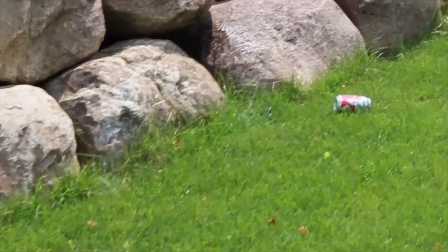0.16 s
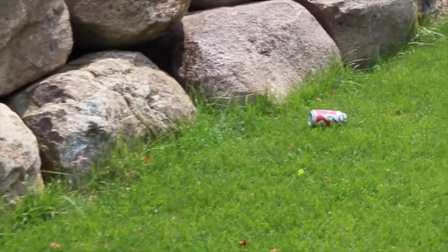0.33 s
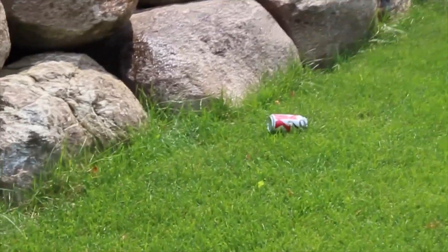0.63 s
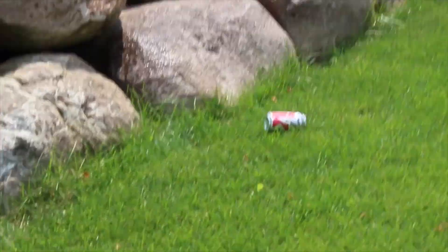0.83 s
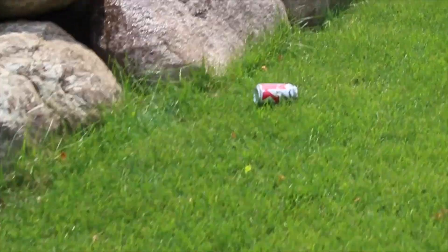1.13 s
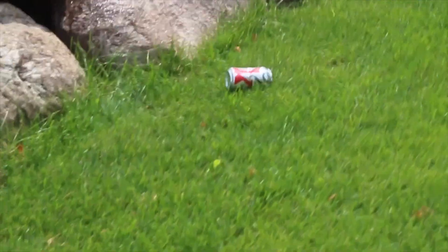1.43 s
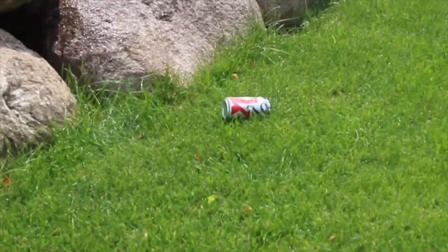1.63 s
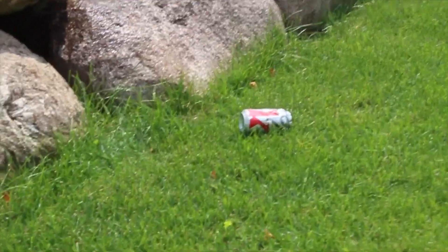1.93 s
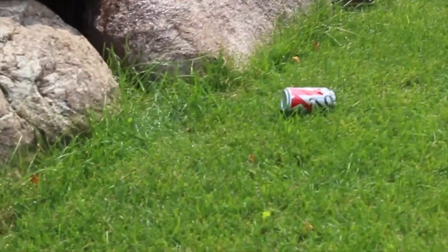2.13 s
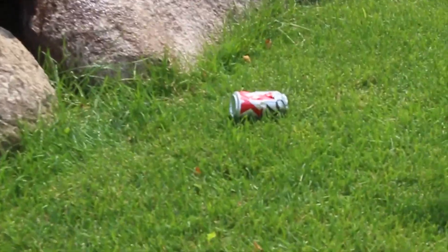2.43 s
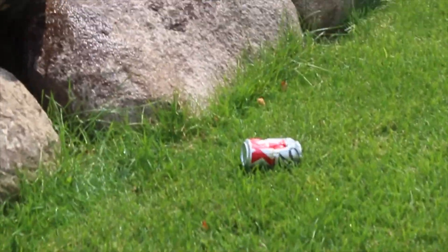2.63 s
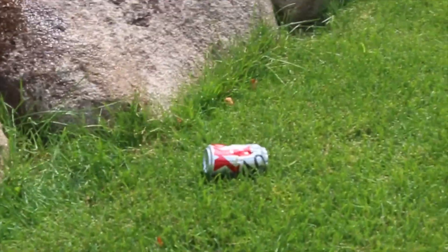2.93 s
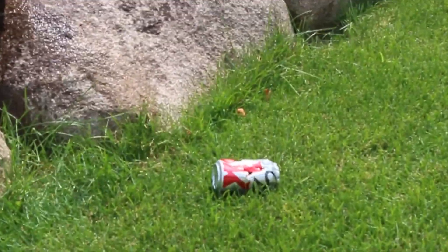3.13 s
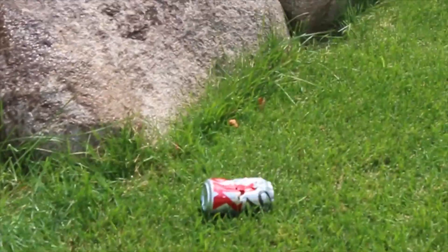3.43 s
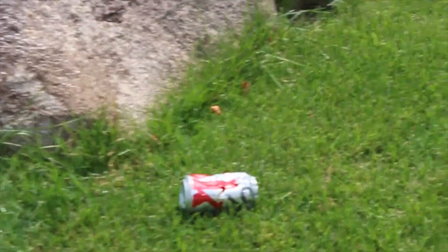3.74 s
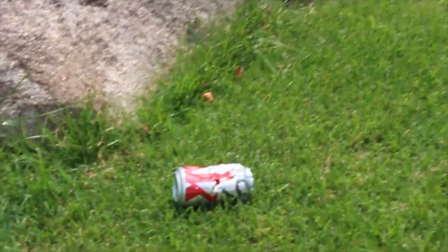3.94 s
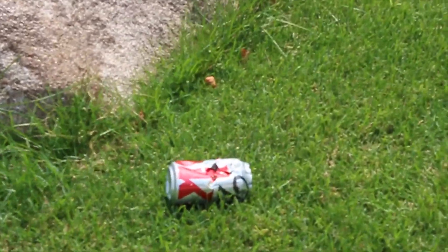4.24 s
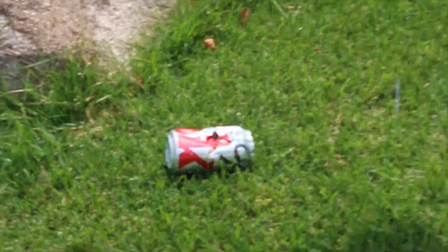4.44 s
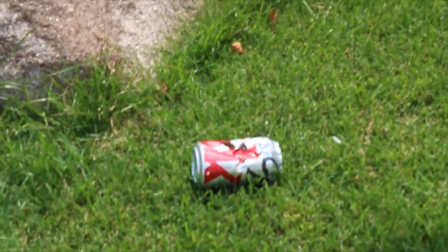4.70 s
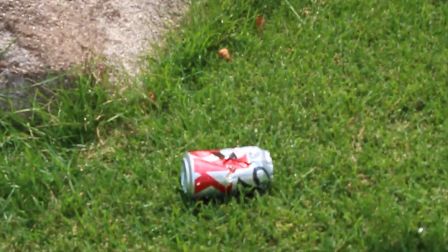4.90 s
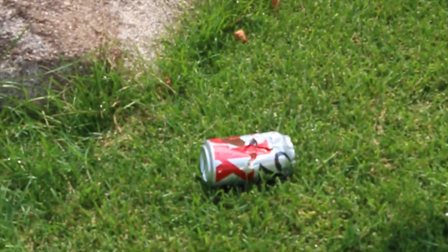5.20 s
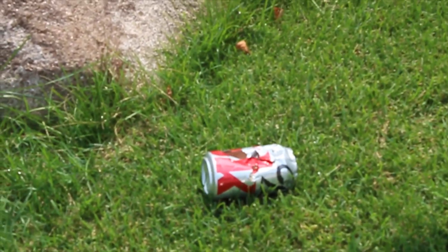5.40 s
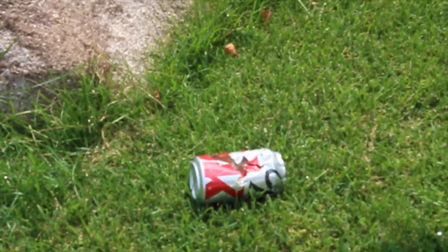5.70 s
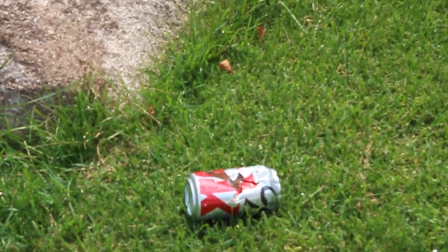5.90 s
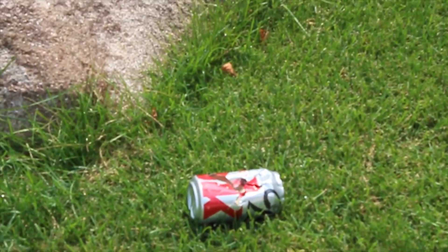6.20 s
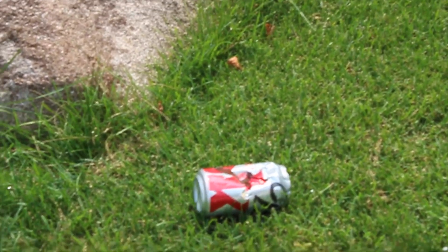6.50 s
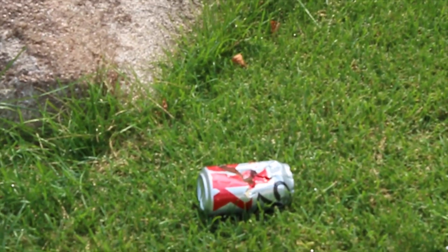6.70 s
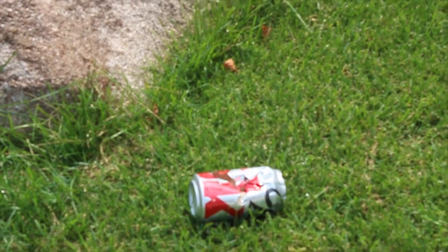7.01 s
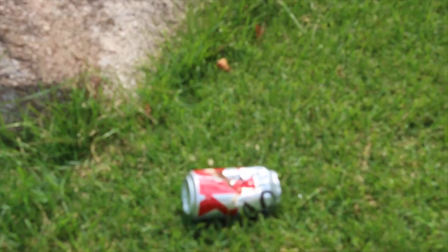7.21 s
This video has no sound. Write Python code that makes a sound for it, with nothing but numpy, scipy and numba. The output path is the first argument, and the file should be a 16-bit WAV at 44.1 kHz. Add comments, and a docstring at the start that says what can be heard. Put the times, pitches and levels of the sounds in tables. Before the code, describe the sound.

In an open backyard with a faint hum of far traffic, a gas pellet pistol cracks close to the microphone, two or three times a second. Every shot joins a puff of gas, a click on a thin metal can and the slide snapping shut, followed by a brief outdoor echo. The trigger ticks softly in the gaps. The clacks grow stronger and the can duller, and the last three shots are quicker and lighter.

```python
"""Far traffic hums over a lawn. Then a gas-powered toy pistol fires eighteen times at a drink can.
In each shot gas bursts out, the pellet hits the can, and the slide (the pistol's moving top) thumps
back, picks up a new pellet and slams shut. The ground, boulders and a far wall send the sound back.
The nearby camera turns itself down at loud shots, so the hum dips and then swells again.
Between shots the trigger ticks. The last few shots come faster and softer."""
import sys
import numpy as np
from scipy import signal
from scipy.fft import rfft, irfft, next_fast_len
from scipy.io import wavfile
from scipy.ndimage import uniform_filter1d
from numba import njit

SR = 44100
rng = np.random.default_rng(int(sys.argv[2]) if len(sys.argv) > 2 else 0)


def log_audio(samples):
    """Write samples as a 16-bit WAV file to the path given in sys.argv[1]."""
    # one column per channel
    frames = np.atleast_2d(samples).T
    # limit to full scale, then quantise
    limited = np.clip(frames, -1, 1)
    pcm = np.round(limited * 32767).astype(np.int16)
    wavfile.write(sys.argv[1], SR, pcm)


N = 324135

# The shots: t/s, blast level/dB, pellet delay/ms, pellet level/dB, shutting delay/ms, shutting level/dB
SHOTS = [(0.2614, 13.5, 11.0, 14, 52.3, -1), (0.9436, 11, 10.7, 15, 55, -1),
         (1.3106, 12, 11.1, 20, 56.4, 1.5), (1.6699, 15, 11.3, 15, 58.3, 0.5),
         (2.0477, 13.5, 11.4, 17, 59, 1.5), (2.391, 10.5, 8.6, 21.5, 59.1, 3.5),
         (2.75, 12.5, 9.7, 19.5, 59.3, 2.5), (3.103, 13.5, 8.2, 10, 59.5, 2.5),
         (3.464, 14, 7.7, 14.5, 59.4, 5), (4.2545, 16, 10.1, 20.5, 60.3, 8),
         (4.6643, 17.5, 8.8, 20.5, 59.7, 9), (5.084, 17.5, 8.65, 23, 61, 9.5),
         (5.5738, 19, 7.4, 17.5, 60.4, 10), (6.141, 19.5, 8.5, 15.5, 62.4, 11),
         (6.6143, 18.5, 10.4, 13.5, 62, 11.5), (6.891, 13.5, 11, 9, 64.4, 8.5),
         (7.0906, 11.5, 10.4, 3, 65.2, 6.5), (7.2954, 10.5, 11.5, 6, 68.0, 3.5)]
# The slide picks the next pellet out of the magazine: t/s, level/dB
PELLET_PICKUPS = [(0.2917, -6), (0.9778, -11), (1.3501, -5), (2.0861, -13.5), (2.4297, -10.5),
                  (2.7872, -10.5), (3.1426, -14), (3.4945, -7), (4.2951, -3), (4.7045, -3), (5.1262, -4.5),
                  (5.6168, -6), (6.1757, 2.5), (6.6579, -1.5), (6.9272, -2), (7.1292, -6.5), (7.3315, -10)]
# Ticks of the trigger: t/s, level/dB
TRIGGER_TICKS = [(.488, -32), (1.474, -26.5), (1.526, -31.5), (2.215, -34), (2.266, -40), (2.61, -32.5),
                 (2.921, -30), (3.272, -32.5), (3.641, -27.5), (4.449, -22), (4.833, -38.5), (4.892, -20.5),
                 (5.277, -21), (5.767, -19), (6.087, -37), (6.108, -37), (6.308, -28.5), (6.464, -29.5),
                 (6.472, -23), (6.567, -34), (6.768, -24), (6.845, -39), (7.011, -29), (7.215, -30)]

# Tone curves, which say how strong the low and high parts of a sound are: f/Hz, level/dB
GAS_TONE = [(40, -18), (100, -12), (300, -3.5), (450, -2), (640, -13), (950, 0), (1300, -6.5), (2000, -7),
            (2800, -2.5), (4500, -4.5), (6200, 0.5), (8500, -4.5), (12700, -12.5), (16000, -12)]  # escaping gas
STEEL_TONE = [(180, -51.5), (300, -29.5), (1190, -12.5), (1870, -1.5), (2210, -7), (2650, -1), (3080, -2.5),
              (3640, -2.5), (4090, -5), (6000, -6.5), (6740, -6.5), (14700, -14), (16000, -23)]  # steel parts
REAR_STOP_TONE = [(100, -37), (200, -12), (380, 1), (620, -9.5), (950, -1.5), (1500, -4.5), (2470, -13.5),
                  (5000, -19), (8600, -22.5), (16000, -33.5)]  # the slide hitting its rear stop
CAN_TONE = [(100, -33.5), (250, -11.5), (480, -1), (650, -11), (1000, -2.5), (1500, -8.5), (3100, -8),
            (5000, -11.5), (9000, -12.5), (16000, -22)]  # the pellet hitting the can
TRIGGER_TONE = [(350, -37.5), (600, -16.5), (1880, -5.5), (2680, -8.5), (3340, -17), (6460, -19),
                (7110, -11.5), (10600, -23), (14500, -21), (16000, -24)]  # small trigger parts
WALL_TONE = [(100, -13), (250, 7), (500, -2), (1000, -7.5), (3000, -11.5), (7000, -5.5), (12000, -16)]  # the far wall's echo
ROAD_TONE = [(15, -51.5), (30, -23.5), (45, -10), (60, -5.5), (80, -8), (112, 1.5), (170, -6), (416, -7),
             (754, -7.5), (1290, -11.5), (2000, -17.5), (3500, -24), (7300, -36), (11000, -40.5),
             (16000, -37.5)]  # the hum of the road
RUMBLE_TONE = [(15, -50.5), (30, -20.5), (55, 0.5), (80, -4.5), (130, -24.5), (300, -60), (16000, -120)]  # the deep rumble under it

# The notes a part rings with when hit (a fade is the time to drop 60 dB): f/Hz, level/dB, fade/s
SLIDE_NOTES = [(1713, -14.5, 0.0056), (2820, -3, 0.017), (3530, -6, 0.031), (4150, -6, 0.0077),
               (7200, -4, 0.0043)]  # the steel slide
FRAME_NOTES = [(336, -1, 0.0094), (770, -6, 0.06), (1170, -15.5, .06), (1420, -6.5, 0.043),
               (2030, -18, 0.091)]  # the pistol's hollow frame
CAN_NOTES = [(482, -7.5, 0.027), (1031, 1.5, 0.024), (1560, -12, 0.038), (2180, -6, 0.028),
             (2900, -2.5, 0.018)]  # the can's thin wall

# The can sags in pitch and rings less as it gets dented: t/s, pitch/ratio, ring level/dB
CAN_DENTING = [(0, 1, -6.5), (2.9, 0.98, -9), (3.4, 0.91, -5), (5.6, .88, -14), (7.35, 0.87, -13.5)]
# The yard answers less as the shooter walks up to the can: t/s, yard level/dB, frame boom level/dB
SHOOTER_WALK = [(0, 2, -0.5), (2, -0.75, -8), (3.6, -3.5, -0.5), (5, -7, 1), (6.3, -6, -0.5),
                (7.35, -5.5, 0)]
# Sound that lingers in the yard: f/Hz, fade/s, level/dB
YARD_FADES = [(100, 0.17, -30), (500, .3, -24), (2000, 0.46, -24), (4000, 0.9, -25), (7000, 0.9, -30.5),
              (10000, 1, -35), (15000, 0.42, -28.5)]
# Far traffic before the camera turns it down: t/s, hum level/dB, rumble level over the hum/dB
TRAFFIC_LEVELS = [(0, -38.5, -3.5), (1.3, -36, -8), (3.199, -40.5, -19.5), (4.199, -38.5, -19),
                  (6.6, -38, -21), (7.35, -46, -21)]

CRACK_ECHO_S, CRACK_ECHO_DB = .0031, -0.15  # the crack's echo off the ground, relative to the crack
STOP_SHARE, STOP_DB = .25, -8.5  # rear stop: share of the shutting delay, level relative to the blast
GROUND_ECHO_S = .0032  # delay of the rear stop's echo off the ground
SHOVE_DB, PAUSE_BOOST_DB_PER_S, COOLING_DB_PER_SHOT = -37.5, 22.5, 1.6  # the low thud of each blast
WALL_DELAY_S, WALL_RISE_S, WALL_FADE_S, WALL_DB = .075, 0.0064, 0.049, -35
TOP_HZ = 16000  # the camera picks up nothing higher


def gas_blasts():
    """The valve hisses, gas rushes up the barrel, shoves the air and cracks; the ground echoes it."""
    shots = shot_steps()["blast"]
    hiss = np.zeros(N)
    t = np.arange(-SR // 140, 0) / SR  # the 7 ms before a shot
    for s, db in shots:
        swell = amp(db - 26.0 + 3200 * t)
        hiss[round(s * SR) - len(t):][:len(t)] = swell * rng.standard_normal(len(t))
    rush = bursts(shots - (.002, 6), GAS_TONE, click=0, rise=0.0017, fade=0.059,
                  tail_db=-38.0, tail_fade=.05)
    # The low thud is louder after a longer pause and weakens as the gas cools.
    pause = np.diff(shots[:, 0], prepend=-.5)
    cooling_db = COOLING_DB_PER_SHOT * np.arange(len(shots))
    shove_db = shots[:, 1] + SHOVE_DB + PAUSE_BOOST_DB_PER_S * pause - cooling_db
    shove = place_hits(np.c_[shots[:, 0] - .001, shove_db], lambda s, t: air_push(t, width=0.0027))
    with_echo = np.r_[shots, shots + (CRACK_ECHO_S, CRACK_ECHO_DB)]
    cracks = bursts(with_echo, GAS_TONE, click=5.52, rise=0.00066, fade=0.021,
                    tail_db=-13.5, tail_fade=0.081)
    return shape_tone(hiss, STEEL_TONE) + rush + shove + cracks


def can_hits():
    """The pellet dents thin metal: a sharp click, a short rattle and a hollow ring."""
    times, pitch, ring_db = np.transpose(CAN_DENTING)

    def dented_ring(s, t):
        return amp(np.interp(s, times, ring_db)) * ringing(CAN_NOTES, t, np.interp(s, times, pitch))

    hits = shot_steps()["pellet"]
    ring = place_hits(hits, dented_ring)
    rattle = bursts(hits, CAN_TONE, click=6.3, rise=0.0003, fade=0.027, tail_db=-19.5, tail_fade=0.067)
    return ring + amp(-4) * rattle


def slide_clacks():
    """The slide thumps back with a quick ground echo, ticks on the magazine, slams shut and rings."""
    steps = shot_steps()
    with_echo = np.r_[steps["stop"], steps["stop"] + (GROUND_ECHO_S, -4)]
    thump = bursts(with_echo, REAR_STOP_TONE, click=0.95, rise=0.0001, fade=0.038,
                   tail_db=-19.0, tail_fade=.06)
    pickup = bursts(PELLET_PICKUPS, STEEL_TONE, click=.6, rise=0.0006, fade=.03,
                    tail_db=-15.0, tail_fade=0.12)
    # It scrapes just before it shuts and rattles once after.
    scrapes = np.r_[steps["shut"] + (-.007, -17), steps["shut"] + (.022, -30)]
    scrape = bursts(scrapes, STEEL_TONE, click=.6, rise=0.00064, fade=0.018,
                    tail_db=-12.5, tail_fade=.06, grit_db=1.0)
    slam = bursts(steps["shut"], STEEL_TONE, click=2.9, rise=0.00014, fade=.02,
                  tail_db=1.5, tail_fade=0.063, grit_db=2.0)
    ring = cut_bass(place_hits(steps["shut"], lambda s, t: ringing(SLIDE_NOTES, t)), hz=1100)
    return amp(-11.0) * thump + amp(-2.0) * pickup + scrape + amp(-10.5) * slam + amp(-8.0) * ring


def frame_boom():
    """The hollow frame booms at the blast, then at the rear stop, whose ground echo follows."""
    def thump(s, t):
        return amp(-3.5) * ringing(FRAME_NOTES, t) - amp(2.0) * air_push(t, width=0.00037)

    steps = shot_steps()
    with_echo = np.r_[steps["stop"], steps["stop"] + (GROUND_ECHO_S, -3.5)]
    thumps = place_hits(with_echo, thump)
    kicks = place_hits(steps["blast"] + (.002, -11.5), lambda s, t: ringing(FRAME_NOTES, t))
    _, boom_gain = gains_over_time(SHOOTER_WALK)
    return boom_gain * cut_bass(thumps + kicks, hz=183)


def trigger_ticks():
    """Small trigger parts knock together with dry ticks."""
    return amp(3.5) * bursts(TRIGGER_TICKS, TRIGGER_TONE, click=1.5, rise=0.0004, fade=.03,
                             tail_db=-16.5, tail_fade=.05)


def yard_scatter(sound):
    """Boulders scatter the sound: it lingers as noise, and each pitch range fades at its own speed."""
    hz, times, spectrum = signal.stft(sound, SR, nperseg=256)
    energy = uniform_filter1d(np.abs(spectrum) ** 2, size=7, axis=0)
    band_hz, fade, level_db = np.transpose(YARD_FADES)
    kept = amp(-120 * times[1] / read_curve(np.c_[band_hz, fade], hz))  # energy left after one time step
    lingering = np.array([signal.lfilter([0, 0, 1 - k], [1, -k], band) for k, band in zip(kept, energy)])
    band_gain = amp(read_curve(np.c_[band_hz, level_db], hz))[:, None]
    noise = signal.stft(rng.standard_normal(N), SR, nperseg=256)[2]
    noise *= np.sqrt(np.abs(lingering) / np.mean(np.abs(noise) ** 2)) * band_gain
    return signal.istft(noise, SR, nperseg=256)[1][:N]


def wall_echo(sound):
    """A far wall sends back one late, dull, smeared echo."""
    echo, step = np.zeros(N + SR), SR // 5
    t = np.arange(SR // 12) / SR
    outline = (1 - np.exp(-t / WALL_RISE_S)) * amp(-60 * t / WALL_FADE_S)
    for start in range(0, N, step):
        smear = outline * rng.standard_normal(len(t))
        smeared = signal.fftconvolve(sound[start:start + step], smear / np.linalg.norm(smear))
        echo[start:][:len(smeared)] += smeared
    delayed = np.pad(echo, (round(WALL_DELAY_S * SR), 0))[:N]
    return amp(WALL_DB) * shape_tone(delayed, WALL_TONE)


def far_traffic():
    """A far road hums in gently drifting patches of noise over a deep rumble."""
    spectrum = signal.stft(rng.standard_normal(N + SR), nperseg=512)[2]
    patches = uniform_filter1d(rng.standard_normal(spectrum.shape), 5, axis=0)  # blur across pitch
    patches = uniform_filter1d(patches, 12, axis=1)  # blur across time
    spectrum *= amp(0.39 * patches / patches.std())
    hum = shape_tone(signal.istft(spectrum, nperseg=512)[1], ROAD_TONE)
    rumble = shape_tone(rng.standard_normal(N), RUMBLE_TONE)
    gain, rumble_gain = gains_over_time(TRAFFIC_LEVELS)
    return gain * (hum / hum.std() + rumble_gain * rumble / rumble.std())


def shot_steps():
    """Rows of t/s, level/dB for each step of a shot. Adding a pair to them shifts time and level."""
    s, blast_db, pellet_ms, pellet_db, shut_ms, shut_db = np.transpose(SHOTS)
    return dict(blast=np.c_[s, blast_db],
                pellet=np.c_[s + pellet_ms / 1000, pellet_db],
                stop=np.c_[s + STOP_SHARE * shut_ms / 1000, blast_db + STOP_DB],
                shut=np.c_[s + shut_ms / 1000, shut_db])


def bursts(rows, tone, click, rise, fade, tail_db, tail_fade, grit_db=5.5):
    """A click and a puff of gritty noise with a tail for each row. Rise and fades are in seconds."""
    out, t = np.zeros(N + SR), np.arange(SR // 8) / SR
    outline = (1 - np.exp(-t / rise)) * (amp(-60 * t / fade) + amp(tail_db - 60 * t / tail_fade))
    for s, db in rows:
        flicker = np.repeat(rng.standard_normal(len(t) // 12 + 1), 12)[:len(t)]
        puff = outline * amp(grit_db * flicker - grit_db) * rng.standard_normal(len(t))
        puff[0] = -click
        out[round(s * SR):][:len(t)] += amp(db) * puff
    return shape_tone(out[:N], tone)


def place_hits(rows, hit):
    """Add hit(s, t) at each row's time and level; s is its start and t the time since then."""
    out, t = np.zeros(N + SR), np.arange(SR // 16) / SR
    for s, db in rows:
        out[round(s * SR):][:len(t)] += amp(db) * hit(s, t)
    return out[:N]


def ringing(notes, t, pitch=1):
    """A struck part rings with fading notes, each a little louder or softer on every hit."""
    return -sum(amp(db + rng.normal(0, 1.9) - 60 * t / fade) * np.sin(2 * np.pi * pitch * hz * t)
                for hz, db, fade in notes)


def air_push(t, width):
    """The air is pushed once and springs back; width is in seconds."""
    return np.e * t / width * np.exp(-t / width) * (1 - t / (2 * width))


def cut_bass(sound, hz):
    """Small parts give off no deep bass, so turn down what lies below hz."""
    return signal.sosfilt(signal.butter(3, hz, "high", fs=SR, output="sos"), sound)


def shape_tone(sound, tone, size=4096):
    """Filter a sound with a tone curve, scaled so that plain noise keeps its energy."""
    gains = amp(read_curve(tone, np.fft.rfftfreq(size, 1 / SR)))
    # Folding the cepstrum (the log gains, turned into time) makes the filter ring only after a hit.
    cepstrum = irfft(np.log(gains + 1e-6), size)
    cepstrum[1:size // 2] *= 2
    cepstrum[size // 2 + 1:] = 0
    response = irfft(np.exp(rfft(cepstrum)), size)
    return signal.fftconvolve(sound, response / np.linalg.norm(response))[:N]


def read_curve(points, hz):
    """Read between rows of f/Hz, value, with the octaves evenly spaced."""
    point_hz, values = np.transpose(points)
    return np.interp(np.log(hz + 1), np.log(point_hz + 1), values)


def gains_over_time(table):
    """Turn rows of t/s and levels into one gliding gain for each level column."""
    times, *levels = np.transpose(table)
    return [amp(np.interp(np.arange(N) / SR, times, db)) for db in levels]


def amp(db):
    """Turn decibels into a gain, the number a sound is multiplied by."""
    return 10 ** (np.asarray(db) / 20)


def scene():
    """Pistol and can, their echoes and the traffic, in one channel."""
    near = gas_blasts() + frame_boom() + slide_clacks() + can_hits() + trigger_ticks()
    yard_gain, _ = gains_over_time(SHOOTER_WALK)
    into_yard = near * yard_gain
    return (near + yard_scatter(into_yard) + wall_echo(into_yard) + far_traffic())[None]


@njit
def auto_volume(level_db, limit_db, attack, hold_samples, recover_db):
    """Gain in dB: drops while the sound is too loud, waits, then climbs back to 0 sample by sample."""
    gains_db, gain_db, quiet_samples = np.zeros(len(level_db)), 0.0, 0
    for i in range(len(level_db)):
        excess_db = level_db[i] + gain_db - limit_db
        quiet_samples = 0 if excess_db > 0 else quiet_samples + 1
        if excess_db > 0:
            gain_db -= attack * excess_db
        elif quiet_samples > hold_samples:
            gain_db = min(gain_db + recover_db, 0.0)
        gains_db[i] = gain_db
    return gains_db


def record(dry):
    """The camera turns loud moments down, flattens peaks that overload it and cuts the highest treble."""
    level_db = 10 * np.log10(np.abs(uniform_filter1d(dry[0] ** 2, 45)) + 1e-12)
    gain_db = auto_volume(level_db, limit_db=-8.5, attack=1 / (0.0034 * SR),
                          hold_samples=.19 * SR, recover_db=35 / SR)
    flattened = np.clip(dry * amp(gain_db), -1.02, 1.02)
    size = next_fast_len(N + 8192)
    edge = np.clip((TOP_HZ - np.fft.rfftfreq(size, 1 / SR)) / 300, 0, 1)
    treble_cut = np.sin(edge * np.pi / 2) ** 2
    return irfft(rfft(flattened, size) * treble_cut, size)[:, :N]


dry = scene()
out = record(dry)
log_audio(out)
```